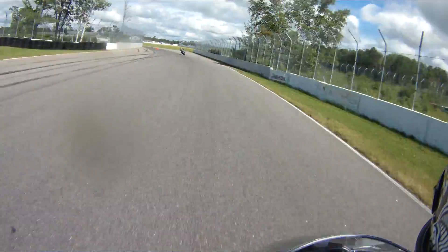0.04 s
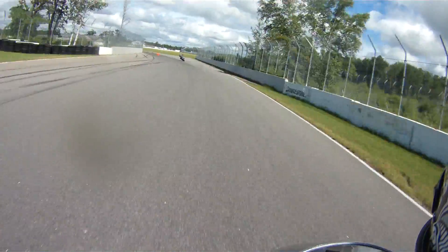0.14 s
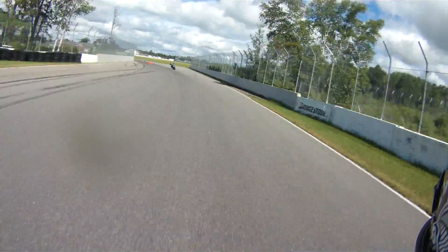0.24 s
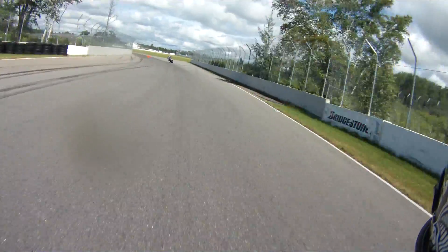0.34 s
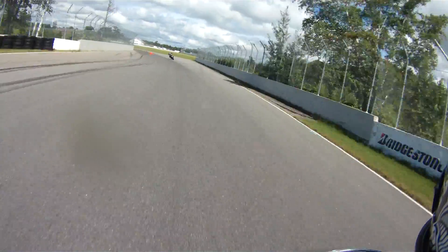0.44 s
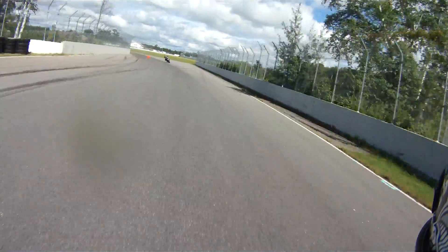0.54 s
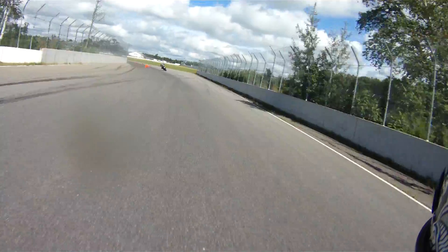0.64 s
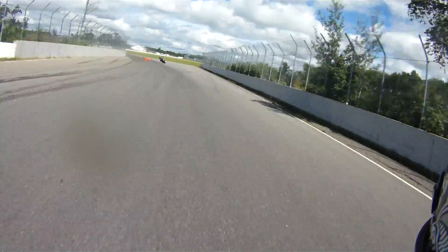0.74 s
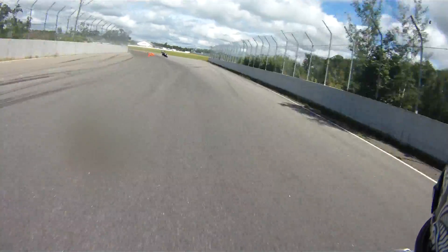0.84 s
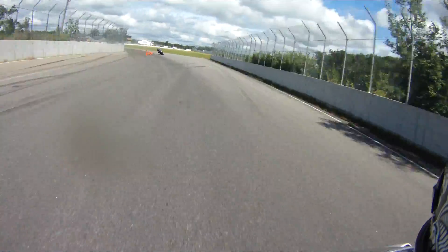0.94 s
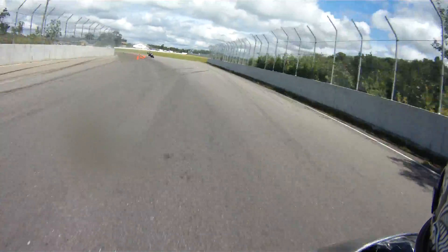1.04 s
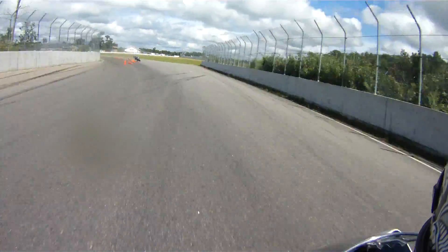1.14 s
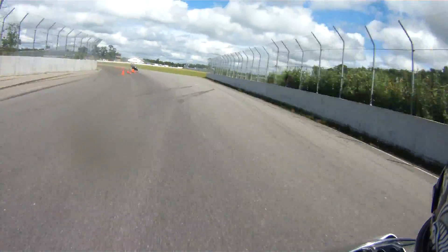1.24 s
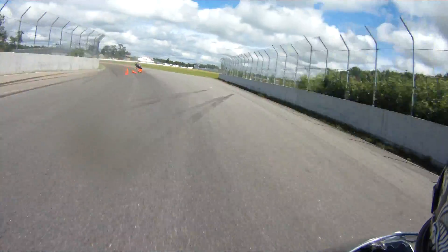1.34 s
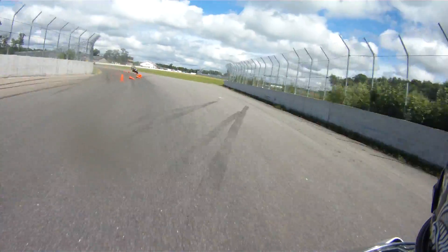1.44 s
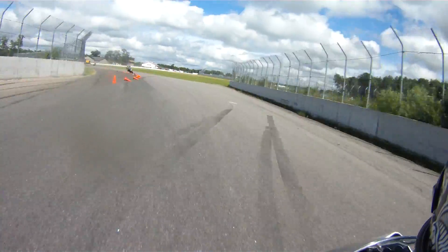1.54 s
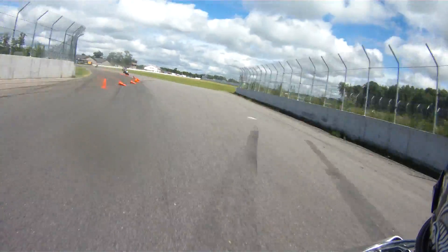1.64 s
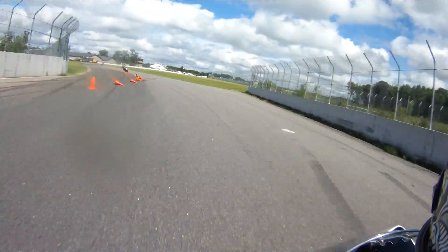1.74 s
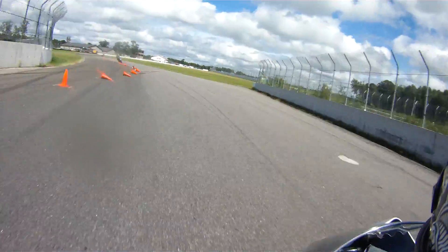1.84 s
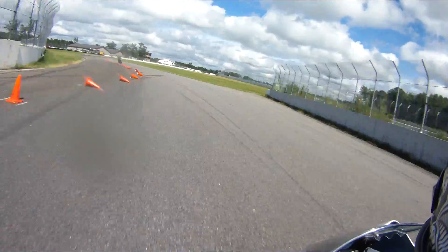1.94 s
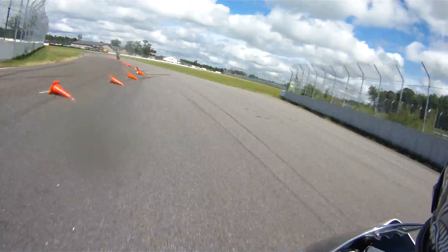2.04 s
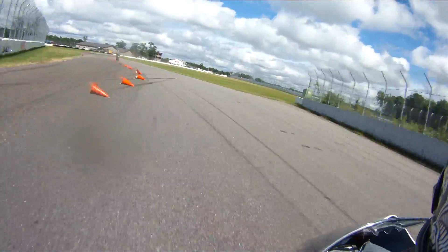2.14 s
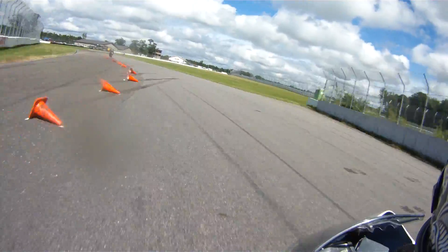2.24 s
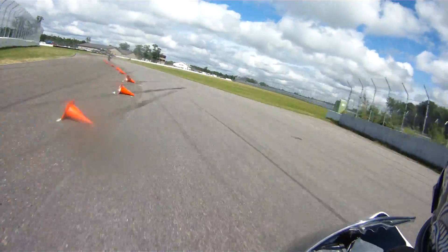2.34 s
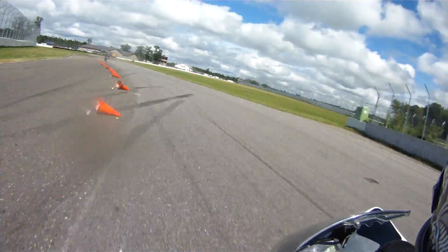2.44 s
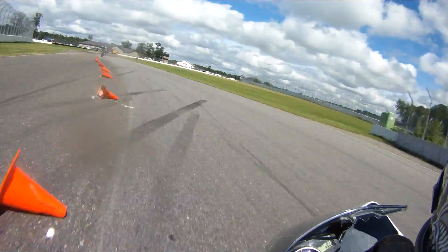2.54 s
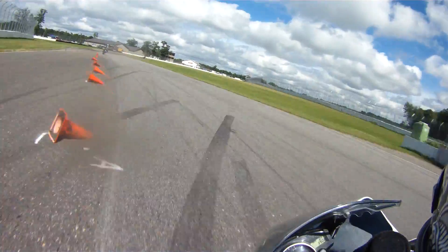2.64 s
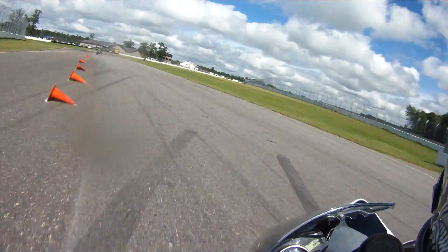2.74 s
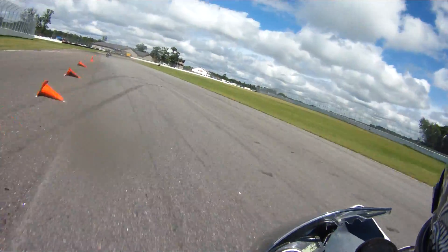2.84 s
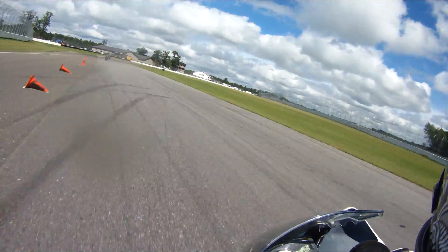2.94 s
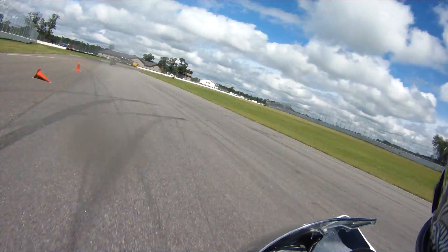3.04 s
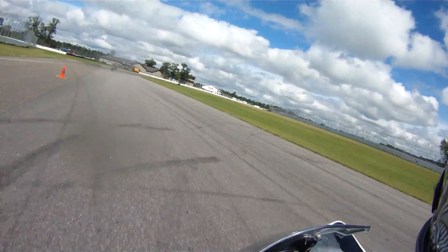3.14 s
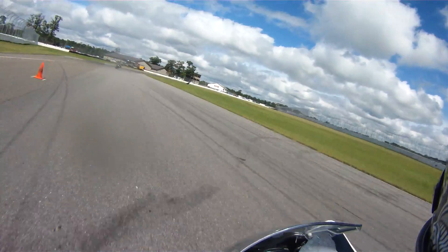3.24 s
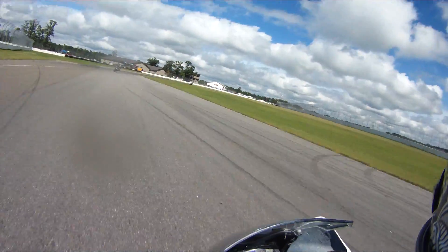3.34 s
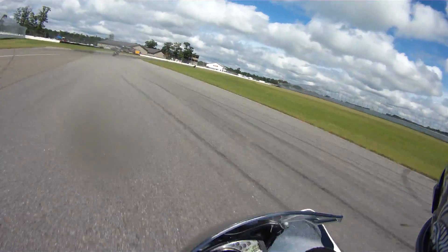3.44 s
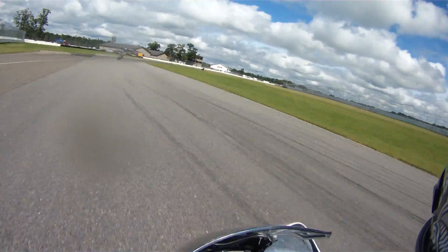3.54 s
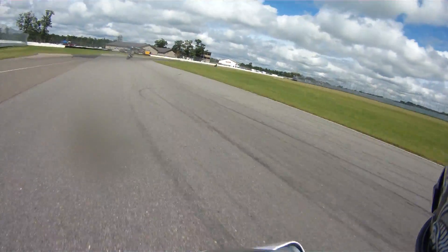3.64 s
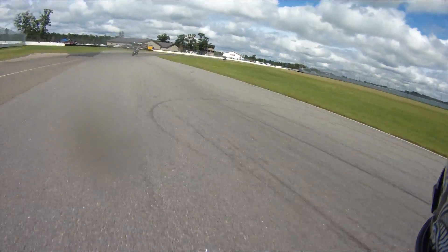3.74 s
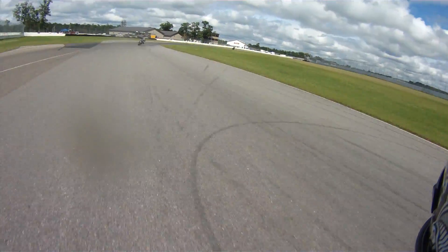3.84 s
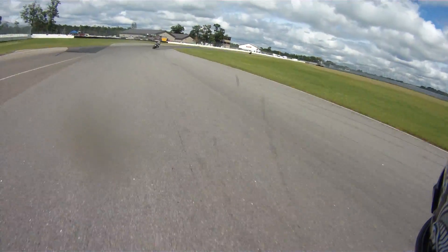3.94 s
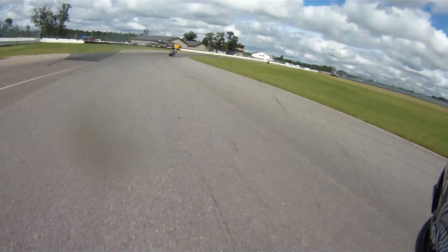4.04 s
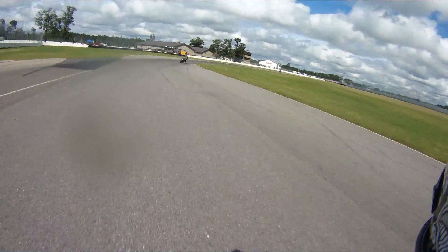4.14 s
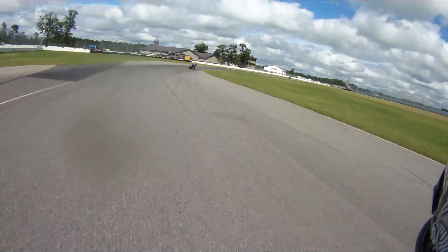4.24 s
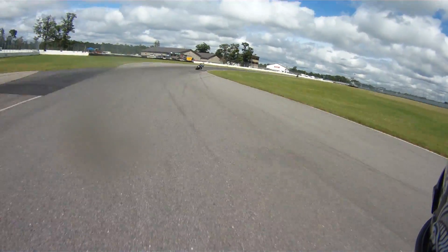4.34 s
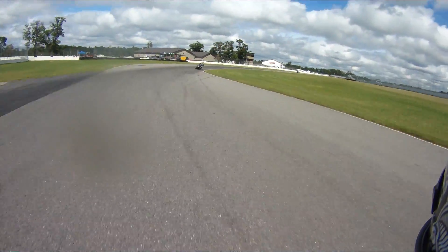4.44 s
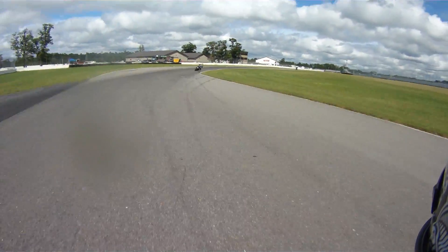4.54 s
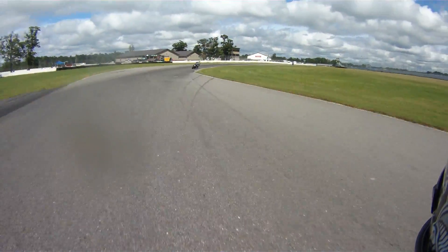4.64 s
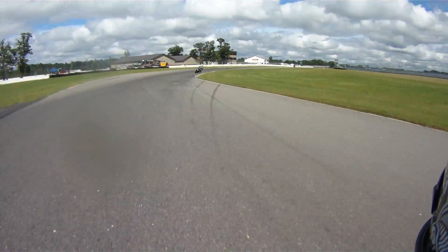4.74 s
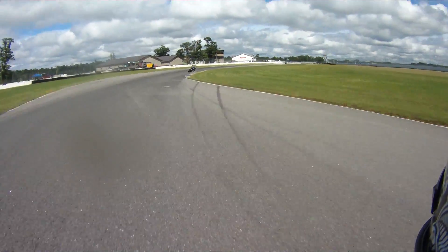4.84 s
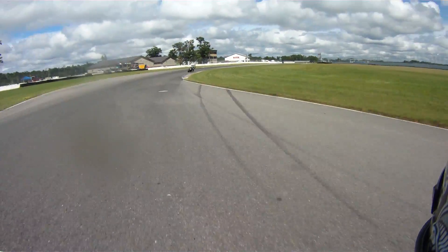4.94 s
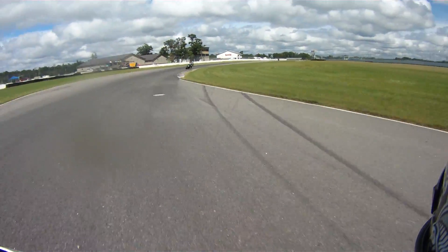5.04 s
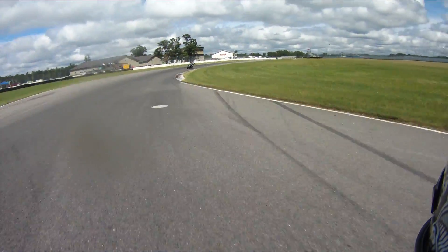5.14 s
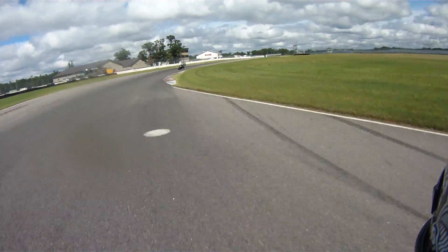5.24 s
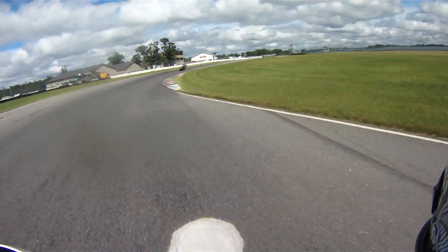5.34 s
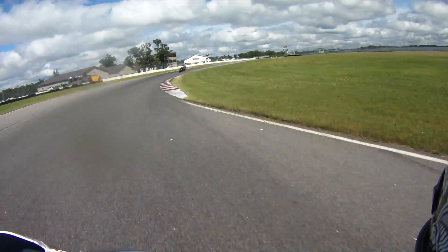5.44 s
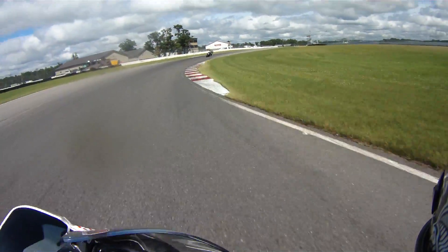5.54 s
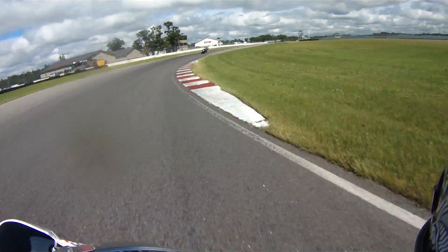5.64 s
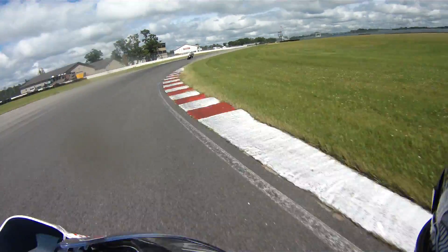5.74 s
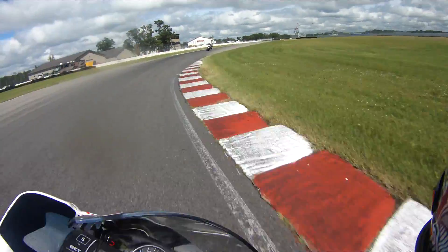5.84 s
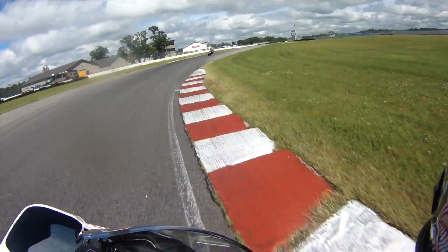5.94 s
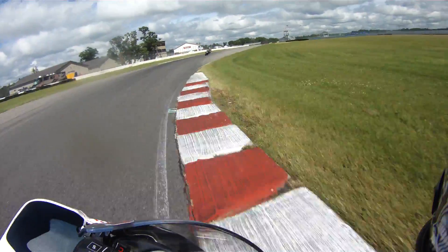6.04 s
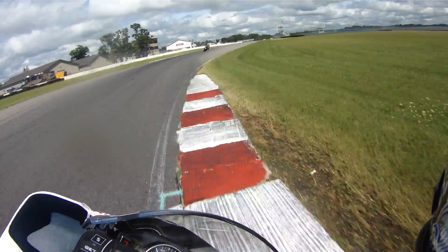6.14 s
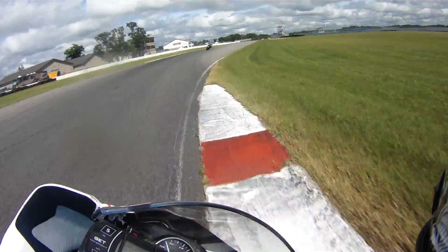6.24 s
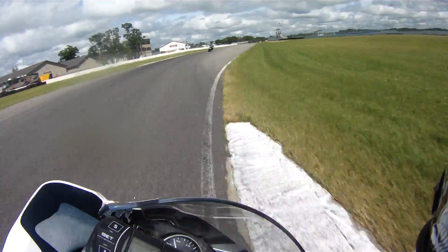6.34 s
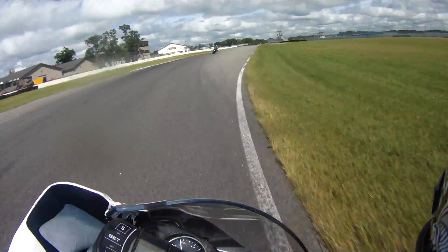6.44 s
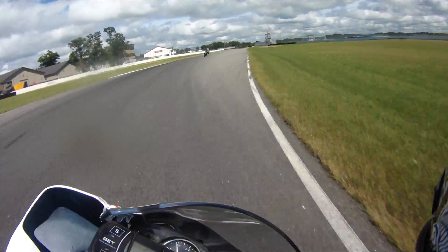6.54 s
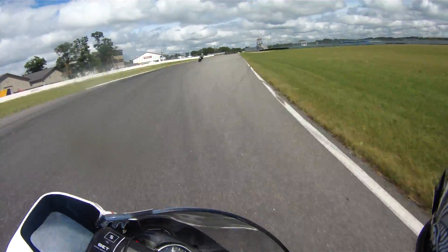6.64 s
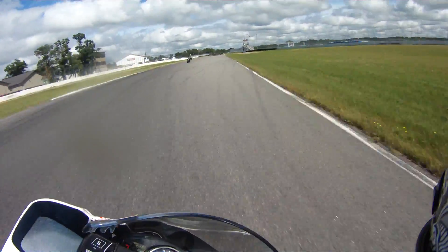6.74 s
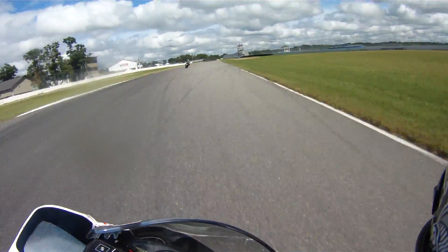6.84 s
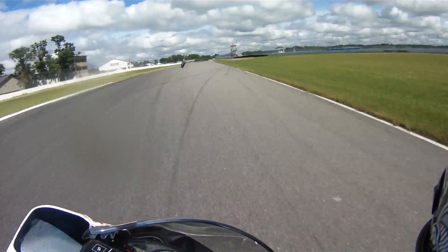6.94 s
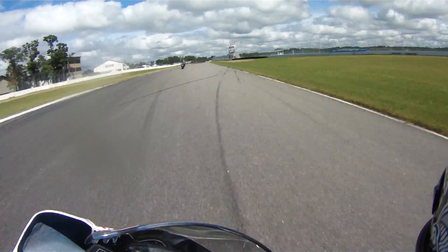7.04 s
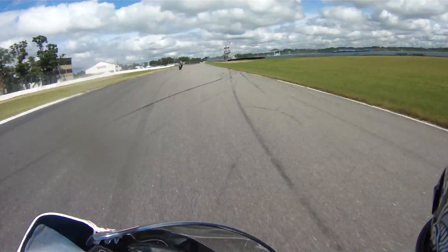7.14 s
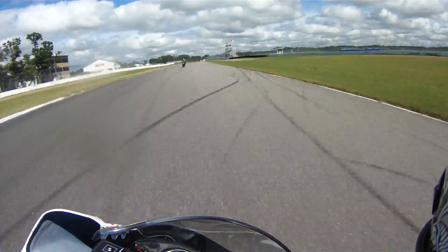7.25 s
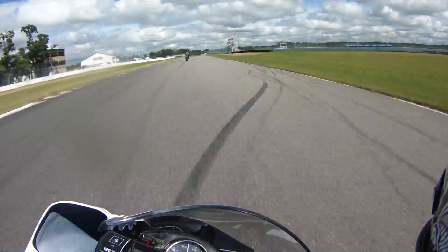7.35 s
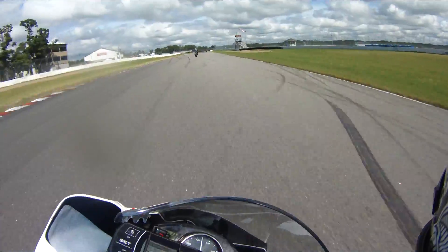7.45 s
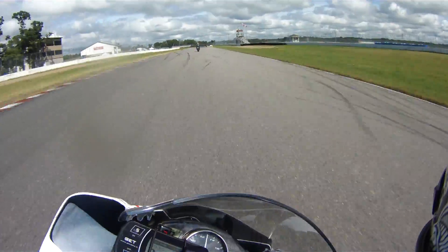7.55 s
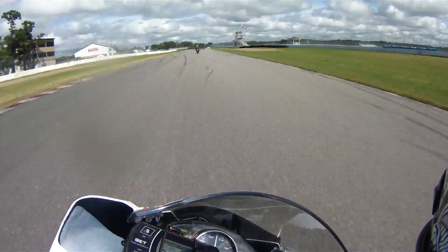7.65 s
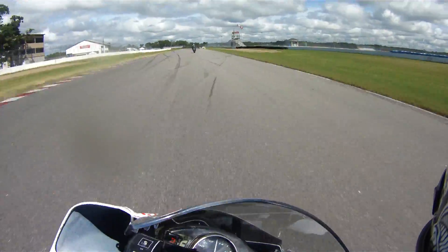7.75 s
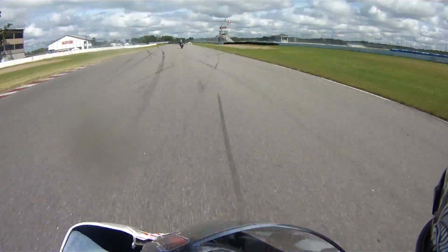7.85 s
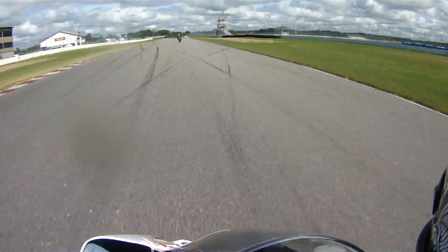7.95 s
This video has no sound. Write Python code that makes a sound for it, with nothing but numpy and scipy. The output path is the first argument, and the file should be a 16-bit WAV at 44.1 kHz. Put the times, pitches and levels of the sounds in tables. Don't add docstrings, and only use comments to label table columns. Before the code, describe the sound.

Heard from a rider's enclosed camera, muffled wind buffets while a four-cylinder engine cuts out, surges once, coasts, blips twice and pulls away hard.

```python
import sys
import numpy as np
from scipy import signal
from scipy.fft import rfft, irfft, next_fast_len
from scipy.io import wavfile
from scipy.ndimage import uniform_filter1d

SR = 44100
rng = np.random.default_rng(int(sys.argv[2]) if len(sys.argv) > 2 else 0)


def store_pcm(level_fs):
    pcm = np.round(np.clip(level_fs, -1, 1) * 32767).astype(np.int16)
    wavfile.write(sys.argv[1], SR, np.atleast_2d(pcm).T)


def attenuation_scalar(level_db):
    decades = np.asarray(level_db, float) / 20
    return 10 ** decades


N = 352403


def level(x, db):
    return x * attenuation_scalar(db) / np.sqrt(np.mean(x ** 2))


def curves(table):
    s, *columns = np.transpose(table)
    t = np.arange(N) / SR
    return [uniform_filter1d(np.interp(t, s, column), size=441) for column in columns]


def walk(rate):
    hold = int(SR / rate)
    held = np.repeat(rng.standard_normal(N // 64), hold)[:N]
    smooth = uniform_filter1d(uniform_filter1d(held, hold), hold)
    return level(smooth, 0)


def band(x, hz, octaves):
    size = next_fast_len(N)
    bin_hz = np.maximum(np.arange(size // 2 + 1) * SR / size, 1)
    away = np.clip(np.log2(bin_hz / hz) / octaves, -1, 1)
    return irfft(rfft(x, size) * np.cos(np.pi / 2 * away), size)[:N]


def engine():
    # time_s, firing_rate_hz
    revs = [(0, 321.5), (.08, 330.5), (.4, 332.6), (1.0, 330), (2.0, 308.8), (2.75, 328.3), (3.05, 343.4),
            (3.23, 347.6), (3.55, 349.4), (3.72, 331), (4.0, 317.1), (4.3, 311), (5.0, 304.4),
            (6.38, 356.4), (6.54, 367), (6.8, 377.8), (7.6, 397.1), (7.99, 401.3)]
    hz, = curves(revs)
    note_db = throttle(hz)
    phase = 2 * np.pi * np.cumsum(hz) / SR + 0.046 * walk(45) + 0.0095 * walk(140)
    ragged_db = np.clip(-.25 * (note_db + 27), 0, 2.5) * walk(35)
    uneven_db = 0.26 * walk(11) + 0.58 * walk(50) + 0.5 * walk(160)
    note = attenuation_scalar(note_db + ragged_db + uneven_db) * np.sin(phase)
    note += loud_orders(hz, note_db, phase) + weak_orders(hz, note_db, phase)
    return np.sqrt(2) * note + intake_hiss(note_db, phase)


def throttle(hz):
    # fully_open_s, shut_s, note_db, opening_db_per_s
    pulls = [
        (-.5, .1, -16.5, 60),
        (-.5, .19, -17.5, 60),
        (2.75, 3.0, -26, 14),
        (3.045, 3.578, -13.6, 58),
        (5.53, 5.665, -24, 40),
        (5.785, 6.08, -23.7, 300),
        (6.37, 9, -8.4, 58),
    ]
    # time_s, note_db
    coast = [
        (.25, -37.5),
        (.6, -51),
        (.85, -37.5),
        (1.4, -40),
        (2.0, -38),
        (3.7, -38.5),
        (4.0, -33),
        (4.55, -39.5),
        (5.0, -34.5),
    ]
    # firing_rate_hz, gain_db
    airbox = [(330, -5.5), (358, 1), (388, -2.5), (399, -1.5)]
    shut_db_per_s, knee_db = 240, 2.5
    t = np.arange(N) / SR
    power = attenuation_scalar(curves(coast)[0]) ** 2
    airbox_db = np.interp(hz, *np.transpose(airbox))

    def soft(db):
        return knee_db * np.logaddexp(0, db / knee_db)

    for full, shut, db, rise in pulls:
        opening_db = soft(rise * (full - t))
        closing_db = soft(shut_db_per_s * (t - shut))
        power += attenuation_scalar(db + airbox_db - opening_db - closing_db) ** 2
    return 10 * np.log10(power)


def loud_orders(hz, note_db, phase):
    strong = (1.75, 2, 3)
    # pitch_hz, level_db against the note
    paths = [
        [(575, -27), (612, -28), (632, -39), (655, -33), (682, -35), (700, -31)],
        [(660, -33), (692, -29), (716, -21), (740, -25), (758, -36), (778, -40), (802, -24)],
        [(985, -28), (1020, -35), (1048, -31), (1065, -38), (1090, -35), (1125, -28.5), (1200, -27.5)],
    ]
    # middle_s, half_length_s, level_db, multiple of the firing rate
    buzzes = [
        (3.48, .09, -33.5, 2),
        (5.97, .15, -40, 2),
        (.1, .1, -41, 1.75),
        (2.97, .22, -39, 1.75),
        (3.43, .07, -42, 1.75),
        (5.56, .1, -42, 1.75),
        (6.29, .06, -44, 1.75),
    ]
    t = np.arange(N) / SR
    out = np.zeros(N)
    for k, path in zip(strong, paths):
        path_db = np.interp(k * hz, *np.transpose(path))
        size = attenuation_scalar(note_db + path_db + 0.56 * walk(9))
        for s, half, db, multiple in buzzes:
            if multiple == k:
                size += attenuation_scalar(db) * np.exp(-((t - s) / half) ** 2)
        tone = np.sin(k * phase + 2 * np.pi * rng.random() + 0.3 * walk(14))
        out += size * attenuation_scalar(0.49 * walk(25)) * tone
    return out


def weak_orders(hz, note_db, phase):
    # multiple of the firing rate, level_db against the note
    orders = [(.5, -46.5), (.75, -41.5), (1.25, -37), (1.501, -50.5), (2.25, -42.5), (2.499, -40),
              (2.75, -47.5), (3.25, -48.5), (3.5, -41.5), (3.75, -45.5), (4, -47.5), (4.25, -39.5),
              (4.5, -41.5), (4.751, -46.5), (5, -55.5), (5.25, -43.5), (5.502, -64), (5.75, -49), (6, -51),
              (6.25, -47.5)]
    # pitch_hz, width_hz, lift_db
    frame = [
        (563, 100, 5.5),
        (1255, 18, 13),
        (1490, 95, -4),
        (1800, 24, 1),
        (1990, 16, 3),
    ]
    out = np.zeros(N)
    for k, db in orders:
        lift = sum(attenuation_scalar(lift_db) / (1 + (2 * (k * hz - f) / width) ** 2) for f, width, lift_db in frame)
        size = attenuation_scalar(note_db + db + 0.55 * walk(7))
        out += (1 + lift) * size * np.sin(k * phase + 2 * np.pi * rng.random() + 0.16 * walk(12))
    return out


def intake_hiss(note_db, phase):
    hiss = band(rng.standard_normal(N), 10000, octaves=.45)
    puffs = (1 + .8 * np.sin(phase)) * hiss
    return attenuation_scalar(0.67 * note_db) * level(puffs, -77)


def eddies():
    # middle_s, half_length_s, level_db, pitch_hz
    puffs = [(0.354, 0.033, -32.5, 493), (0.662, 0.023, -43, 676), (3.527, 0.063, -32, 1000),
             (3.614, 0.036, -39, 876), (3.719, 0.028, -35, 760), (3.76, 0.31, -36, 790),
             (3.86, .035, -32.5, 850), (3.94, 0.053, -33, 879), (4.1, 0.056, -41, 1000),
             (5.097, 0.086, -36, 645), (5.192, .03, -32, 540), (5.3, 0.019, -33, 500),
             (5.415, 0.019, -34.5, 550), (5.528, 0.042, -32, 650), (5.609, 0.015, -33.5, 850),
             (5.791, 0.037, -33, 674), (6.331, 0.11, -32.5, 840), (6.847, .04, -35.5, 900),
             (7.765, 0.057, -41.5, 805), (4.48, .13, -36.5, 150), (6.06, .05, -45, 80),
             (7.671, 0.15, -33.5, 116), (3.62, 0.046, -35, 850)]
    t = np.arange(N) / SR
    grains = attenuation_scalar(3.0 * walk(130))
    out = np.zeros(N)
    for s, half, db, hz in puffs:
        air = level(band(rng.standard_normal(N), hz, octaves=.55), db)
        out += air * grains * np.exp(-((t - s) / half) ** 2)
    return out


def knocks():
    # start_s, peak_db, pitch_hz
    hits = [
        (3.991, -22, 606),
        (5.038, -18.5, 760),
        (6.437, -39, 2793),
        (6.541, -29.5, 2853),
        (7.388, -40, 3500),
    ]
    t = np.arange(1000) / SR
    out = np.zeros(N)
    for s, db, hz in hits:
        cycles = hz * t / 0.87
        swell = np.e * cycles * np.exp(-cycles)
        start = int(s * SR)
        out[start:start + len(t)] += attenuation_scalar(db) * swell * np.sin(2 * np.pi * hz * t)
    return out


def wind():
    # time_s, level_db against calm
    airflow = [(0, 1.2), (.4, 0.9), (1.5, 0), (2.0, 1), (2.25, -0.7), (2.75, -1), (3.25, 2), (4.0, 2.5),
               (4.4, -0.5), (4.62, -0.3), (5.0, 0.5), (5.35, 0.5), (6.12, 1), (6.5, 3), (6.9, 2.5),
               (7.7, 5.5), (7.99, 4)]
    # middle_s, half_length_s, gain_db, centre_hz
    gust_table = [(.9, 0.33, 1.8, 120), (3.75, .45, -5, 120), (4.52, 0.15, 3.5, 150), (4.8, .05, 7.5, 70),
                  (6.06, .06, 2.5, 140), (4.3, .1, 6, 91), (4, 0.034, 6, 160), (5.8, .14, 3.5, 130),
                  (6.5, 0.44, 4, 90), (7.35, 0.17, 5.5, 110), (8.9, 0.093, -3, 120), (3.74, 0.41, 1, 900),
                  (6.3, 0.2, -0.2, 850), (7.41, 0.27, -2.7, 850), (6.1, 0.76, -0.9, 6000)]
    # pitch_hz, level_db per Hz
    calm = [(22, -23), (45, -10), (100, -6.5), (230, -0.45), (1000, -4.5), (2000, -12.5), (2900, -24),
            (3600, -32), (5000, -38), (5600, -32.5), (6400, -37), (7800, -48.5), (12500, -56),
            (14300, -63.5)]
    gust_octaves, gust_edge = 1.4, 3
    t = np.arange(N) / SR
    s, half, gust_db, gust_hz = np.transpose(gust_table)
    gusts = gust_db[:, None] * np.exp(-abs((t - s[:, None]) / half[:, None]) ** gust_edge)
    flow_db, = curves(airflow)
    shared, slaps = walk(4.3), walk(45)
    out = np.zeros(N)
    for hz in 22 * 2 ** (np.arange(30) / 3):
        reach = np.exp(-(np.log2(hz / gust_hz) / gust_octaves) ** 2)
        shared = .8 * shared + .6 * walk(6)
        db = flow_db + reach @ gusts + 0.34 * shared + 0.68 * slaps + 0.63 * walk(20)
        out += attenuation_scalar(db) * band(rng.standard_normal(N), hz, 1 / 3)
    size = next_fast_len(N)
    bin_hz = np.arange(size // 2 + 1) * SR / size
    calm_hz, calm_db = np.transpose(calm)
    colour = attenuation_scalar(np.interp(np.log(bin_hz + 1), np.log(calm_hz), calm_db))
    return level(irfft(rfft(out, size) * colour, size)[:N], -30)


def scene():
    mix = engine() + eddies() + knocks() + wind()
    return mix[None]


def roll_off(x):
    return signal.sosfilt(signal.butter(12, 15050, fs=SR, output="sos"), x)


def record(dry):
    return roll_off(dry)


dry = scene()
out = record(dry)
store_pcm(out)
```